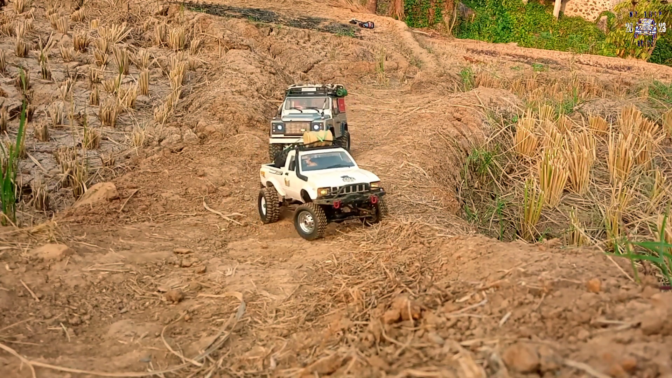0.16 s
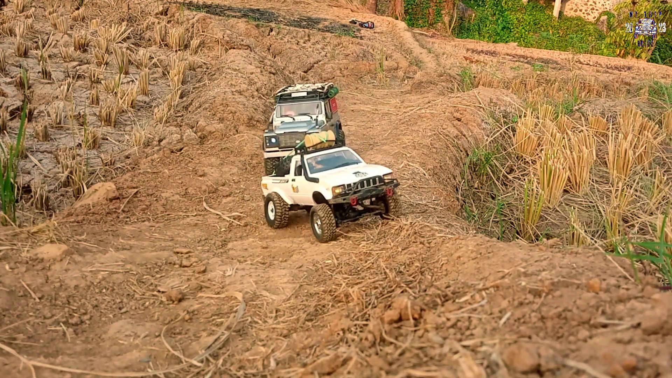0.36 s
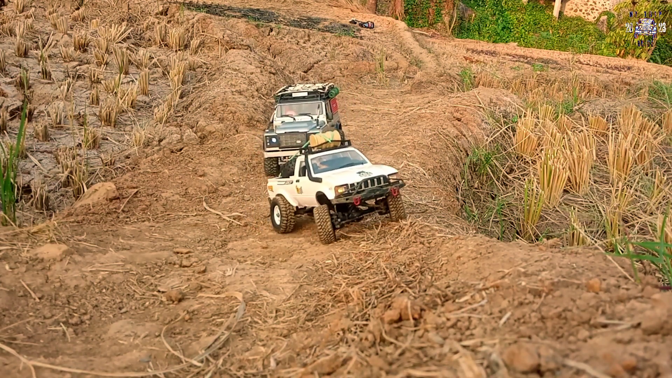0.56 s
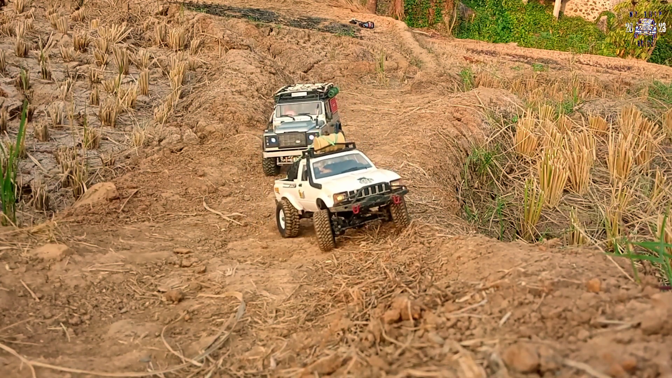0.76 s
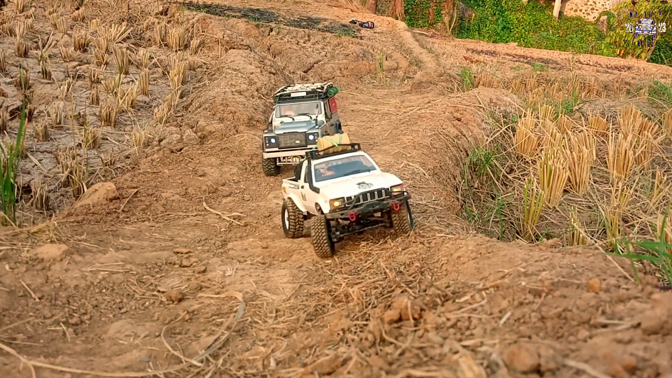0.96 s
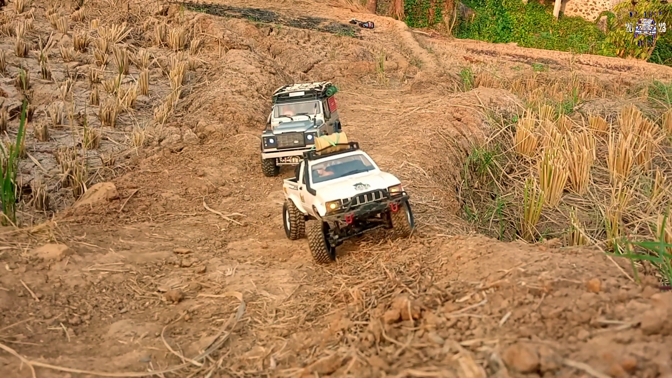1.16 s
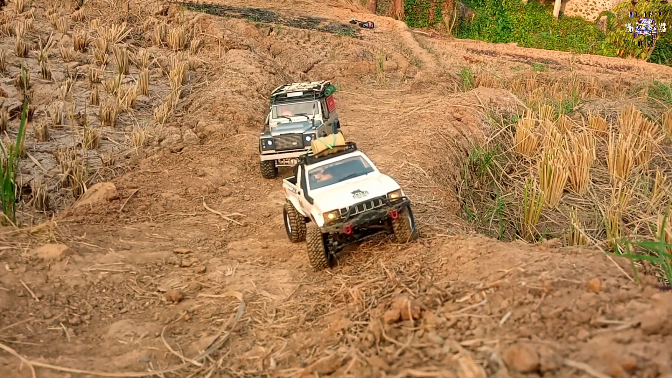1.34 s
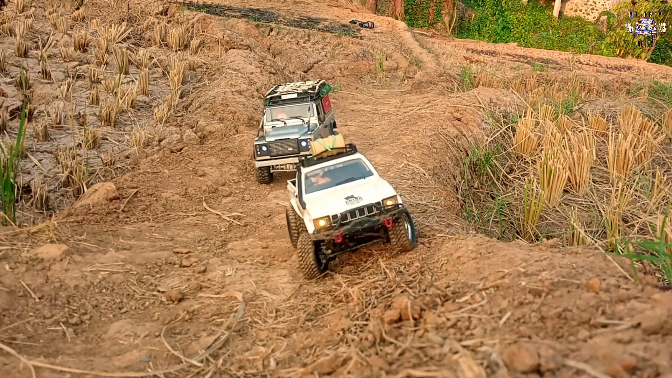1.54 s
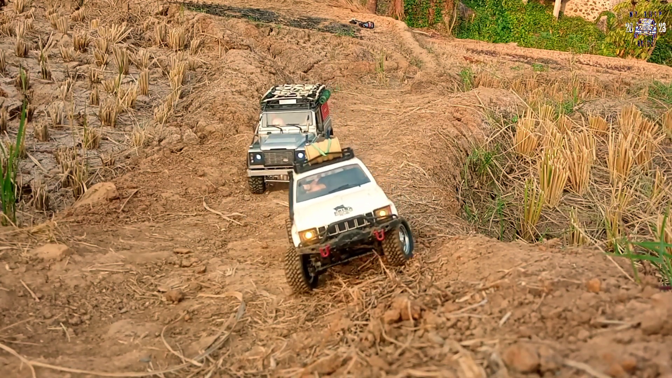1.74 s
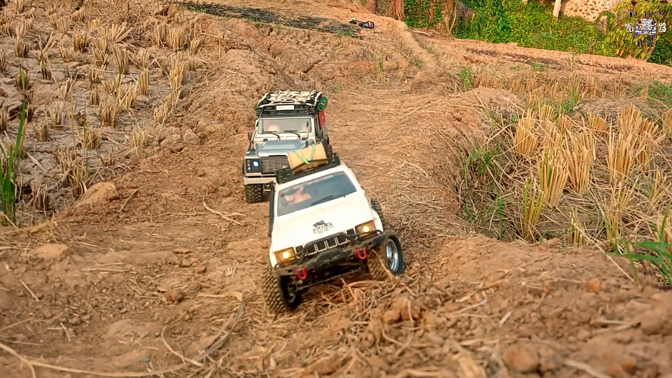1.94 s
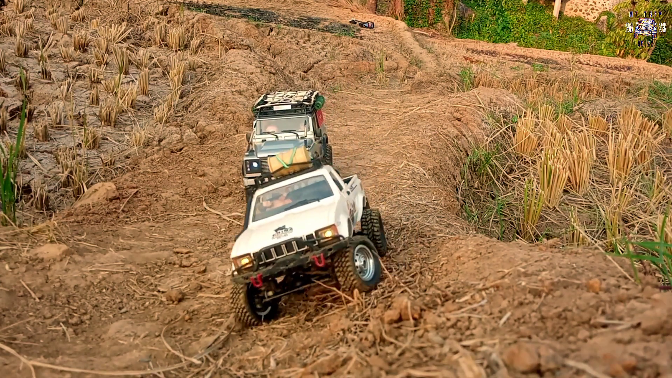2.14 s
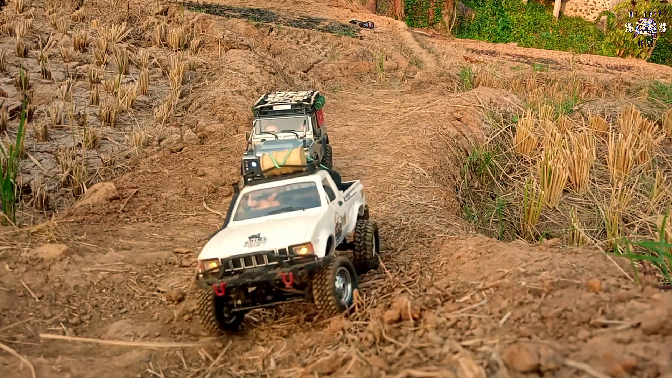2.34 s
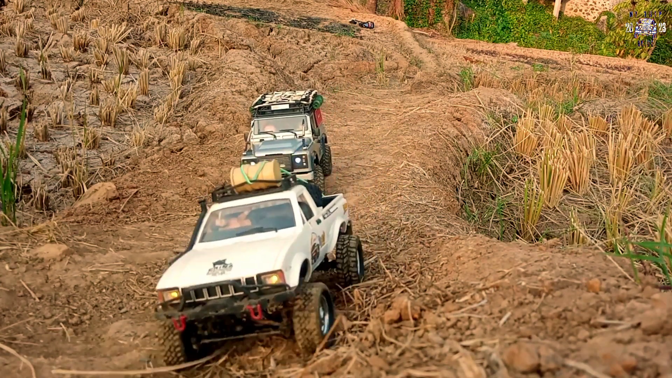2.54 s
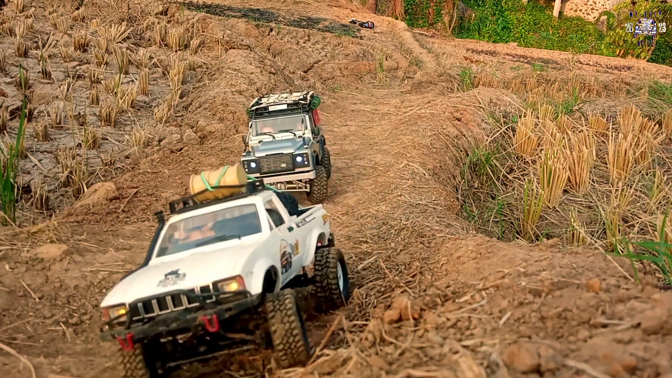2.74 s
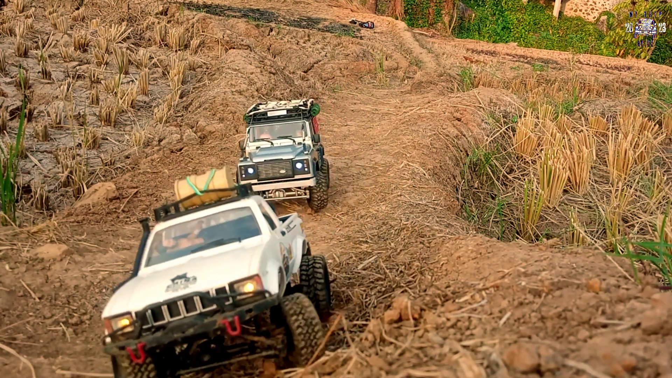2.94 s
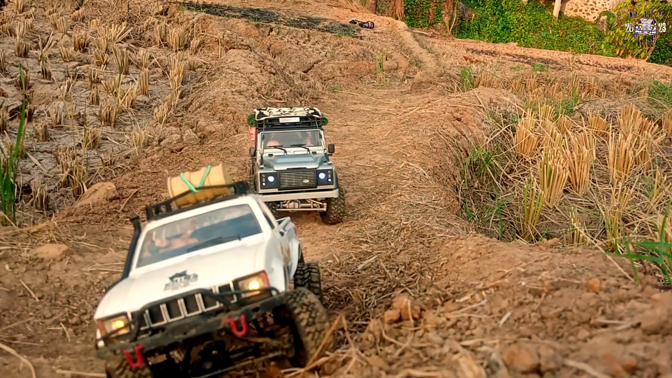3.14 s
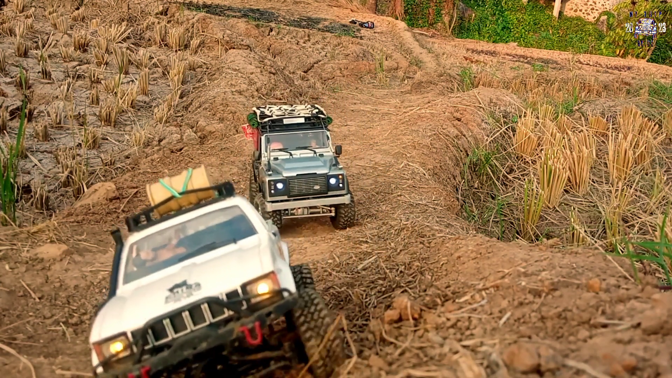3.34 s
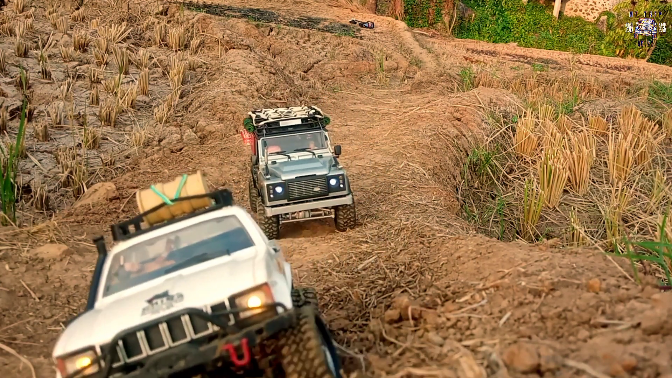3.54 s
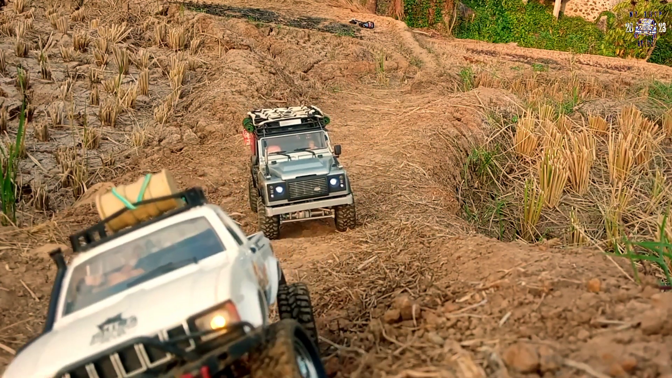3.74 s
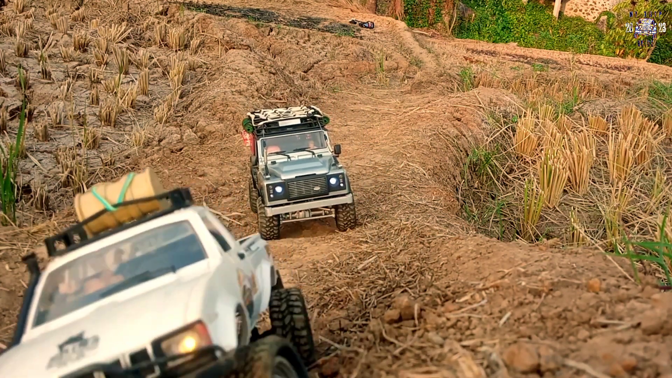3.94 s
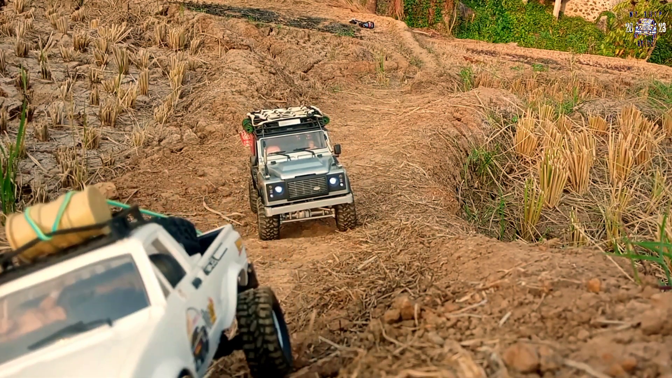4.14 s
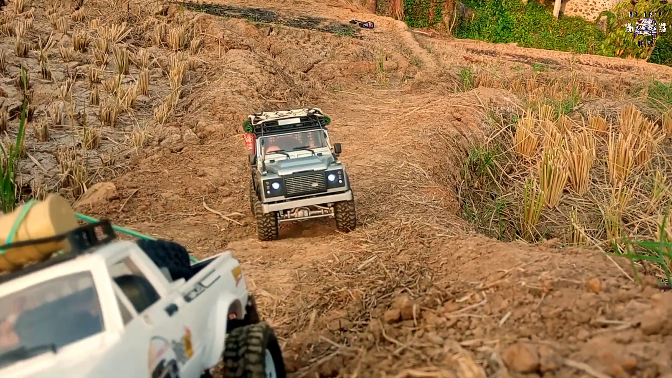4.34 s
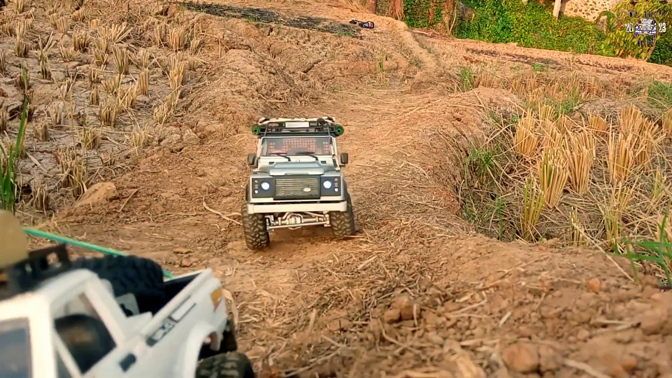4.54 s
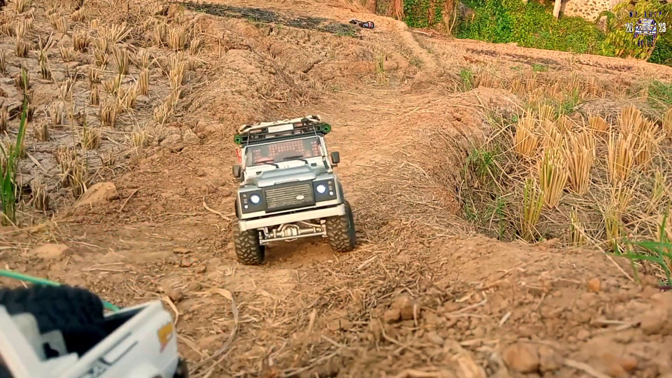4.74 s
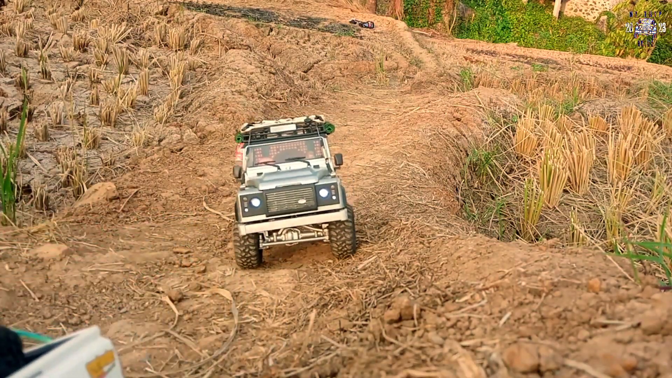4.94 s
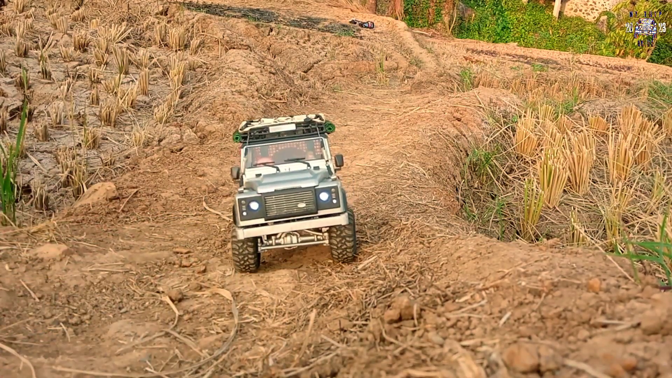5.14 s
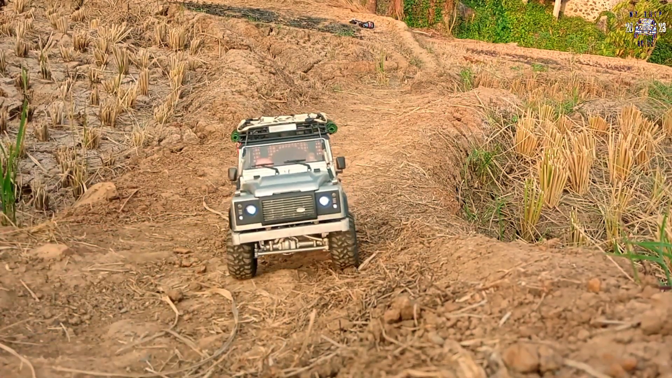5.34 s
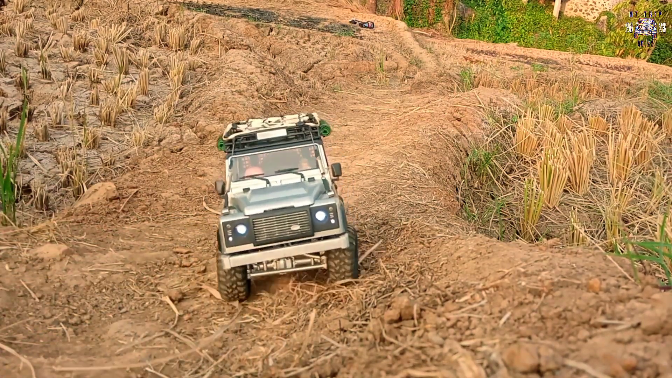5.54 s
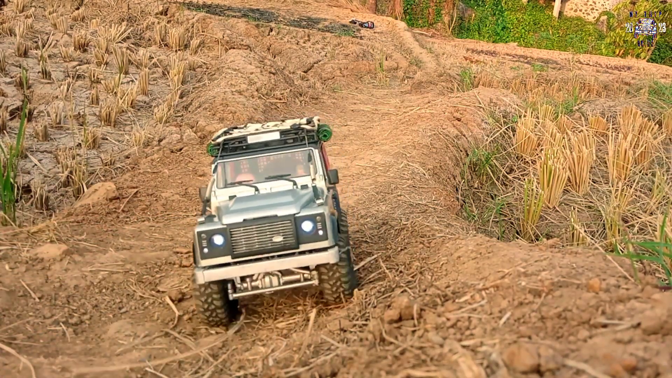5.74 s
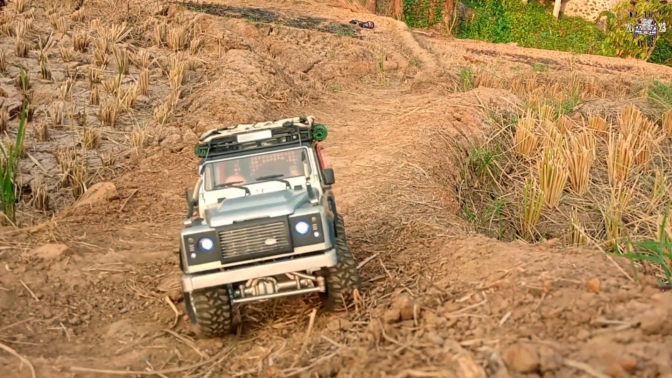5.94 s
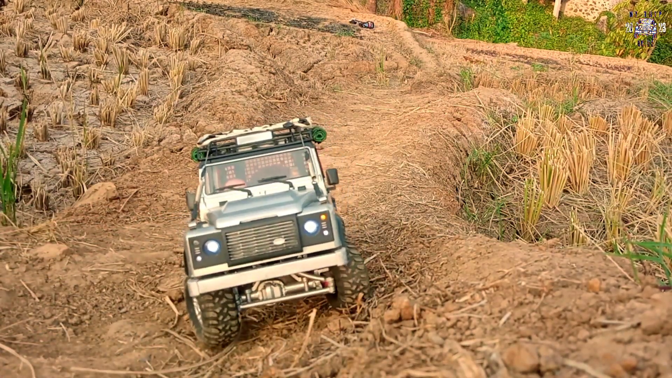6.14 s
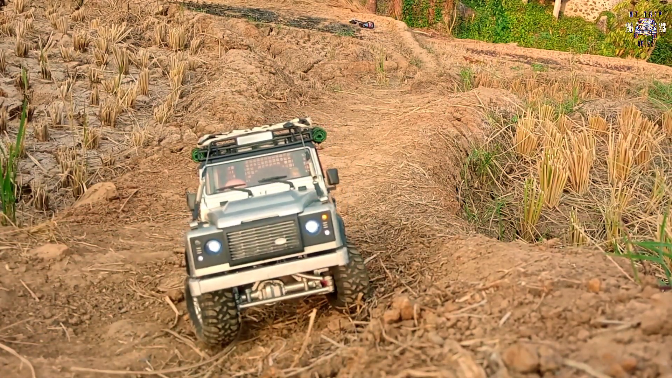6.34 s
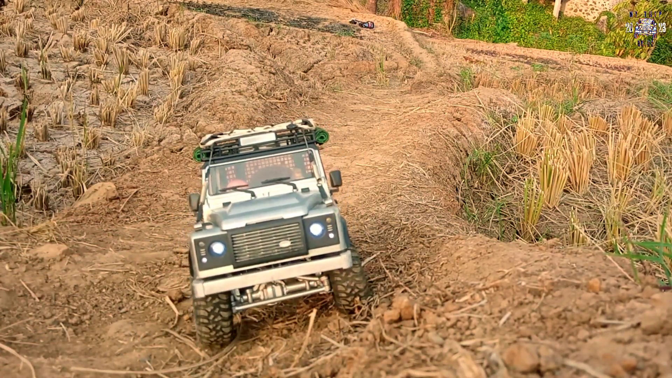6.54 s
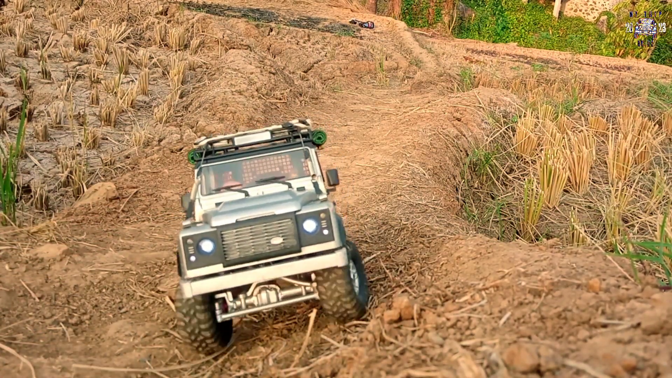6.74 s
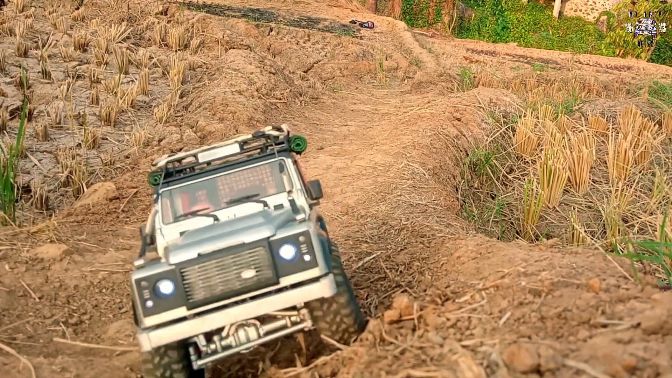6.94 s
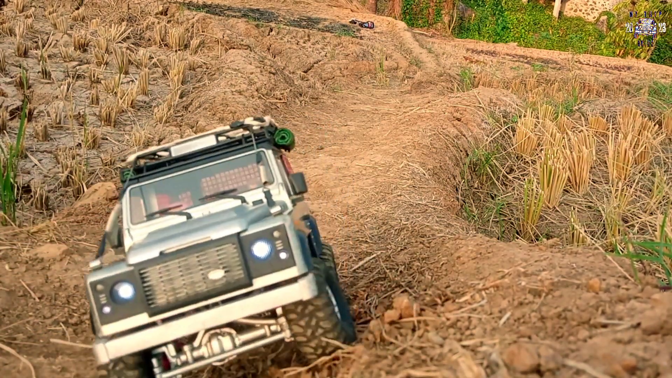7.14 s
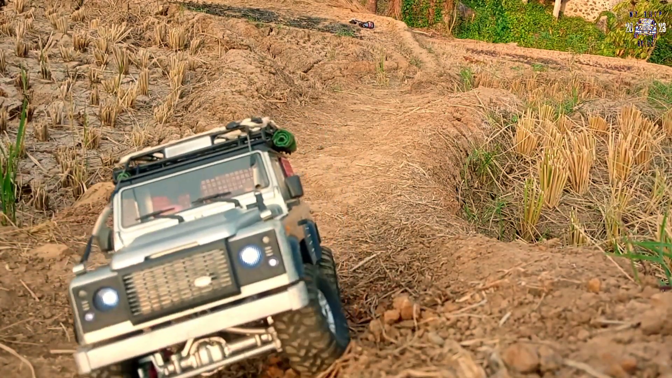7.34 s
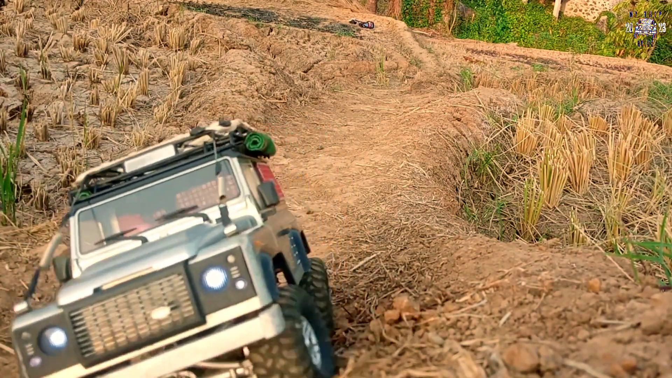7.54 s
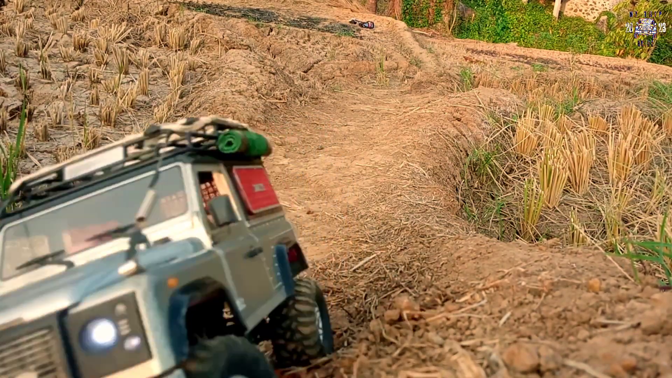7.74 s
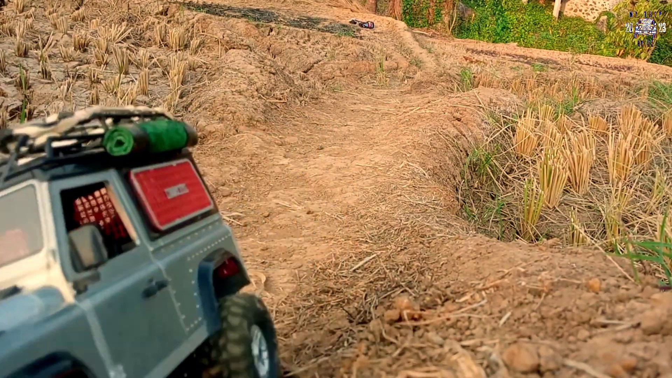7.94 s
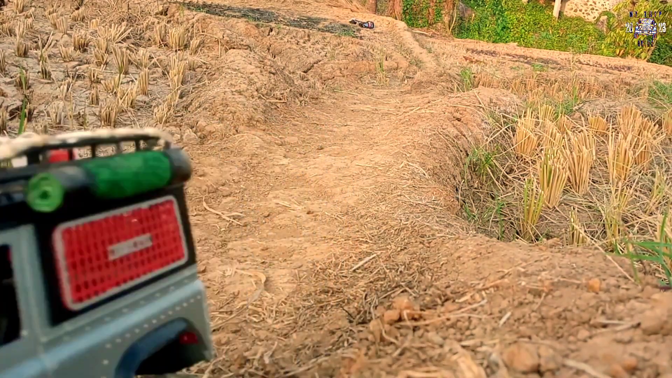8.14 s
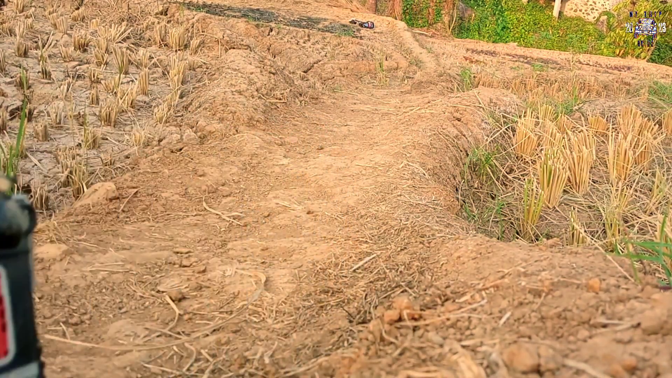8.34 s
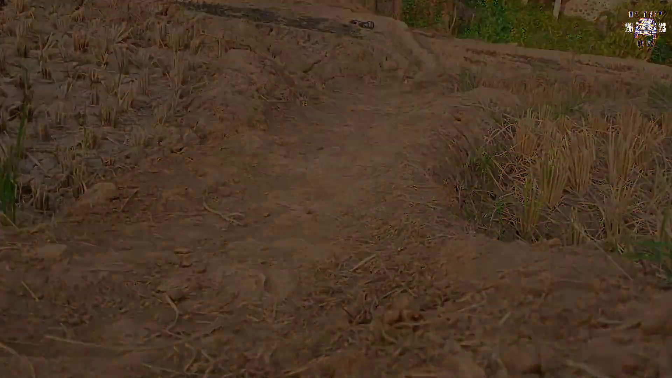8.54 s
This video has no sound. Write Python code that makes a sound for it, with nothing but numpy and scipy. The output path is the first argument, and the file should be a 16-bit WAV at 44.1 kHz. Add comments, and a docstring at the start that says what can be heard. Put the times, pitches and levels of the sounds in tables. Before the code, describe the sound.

Open, dry outdoor air with a distant one-cylinder diesel thudding softly about 17 to 20 times a second throughout; a faint far engine hum surfaces around 0.5-1.9 s. Close to a low microphone, a small electric truck creeps over soil, its gears whining in short uneven pulses near 2-3 kHz with a dry treble rasp, briefly easing around 1.2 s. Tyres grind crumbly dirt, with light straw ticks and small knocks at 3-4.6 s. From 4.4 s the whine strengthens; another distant engine rises in pitch until about 6.3 s. Around 5.3 s a second truck takes over, louder and shriller at 3-3.8 kHz, with a droning shell, strong crunching and snaps near 6 s. The whine weakens after 7.6 s. Around 8 s thin high squeals sound, sharp cracks hit at 8.1 and 8.4 s, a wheel drops with a low thump at 8.3 s, then gears and tyres subside.

```python
"""Far away a slow one-cylinder diesel thuds, made of noise puffs, and an engine hums briefly as harmonics.
Nearby a small electric truck creeps over dry soil: each touch of the throttle makes its gear tones whine and rasp.
Its tyres grind dirt (clumped noise) and snap straw (short noise bursts). Then a far engine hums with rising pitch
while a second truck takes over, close and louder, with a droning shell. Near the end thin squeals (narrow noise)
sound and a wheel drops off a lump (a short low tone)."""
import sys
import numpy as np
from scipy import signal
from scipy.fft import rfft, irfft, next_fast_len
from scipy.io import wavfile
from scipy.ndimage import uniform_filter1d, map_coordinates

SR = 44100
rng = np.random.default_rng(int(sys.argv[2]) if len(sys.argv) > 2 else 0)


def inscribe(sig):
    """Save sig as 16-bit PCM at rate SR to the path in sys.argv[1].

    A 1-D sig is mono; a 2-D sig holds one channel per row.
    Samples are clipped to [-1, 1] before scaling.
    """
    pcm = np.round(np.clip(np.atleast_2d(sig).T, -1, 1) * 32767)
    wavfile.write(sys.argv[1], SR, pcm.astype(np.int16))


N = 383219
T = np.arange(N) / SR  # time of each sample, s

# Touches of the throttle: middle t/s, highest gear-mesh f/Hz, time within SAG_HZ of it/s, whine level/dB
THROTTLE_TOUCHES = [(.122, 2600, .055, -33), (.188, 2000, .06, -39), (.262, 1870, .09, -39),
                    (.41, 1800, .1, -42), (.507, 2270, .035, -38), (.8, 2020, .12, -44),
                    (1.692, 2480, .05, -33), (1.73, 2350, .08, -36), (1.82, 2480, .11, -35),
                    (1.903, 2520, .055, -35), (1.96, 2180, .08, -38), (2.083, 2220, .07, -41),
                    (2.18, 2470, .052, -37), (2.385, 2190, .1, -38), (2.49, 2460, .2, -39),
                    (2.6, 2750, .15, -41), (2.695, 3260, .11, -37), (2.8, 2520, .13, -36),
                    (2.88, 2300, .08, -41), (2.92, 3050, .035, -36), (3.23, 2180, .04, -38),
                    (3.285, 2150, .035, -40), (3.43, 2180, .08, -40), (3.515, 2720, .064, -30.5),
                    (3.65, 2180, .09, -45), (4.224, 2470, .054, -32), (4.366, 2640, .075, -31),
                    (4.44, 2550, .12, -35), (4.497, 2950, .04, -32), (4.612, 2610, .075, -32),
                    (4.69, 2320, .14, -33), (4.77, 2650, .08, -31), (4.817, 3130, .042, -23),
                    (4.897, 2660, .07, -27), (4.963, 2700, .04, -26), (5.052, 2340, .052, -29),
                    (5.12, 2460, .14, -28), (5.225, 2270, .06, -29), (5.344, 2040, .13, -31),
                    (5.465, 2600, .045, -28), (5.53, 2180, .03, -27), (5.628, 3180, .095, -22),
                    (5.75, 3000, .16, -28.5), (5.92, 3580, .095, -20), (6, 3520, .085, -20),
                    (6.08, 2830, .08, -30), (6.175, 3250, .075, -24), (6.24, 3600, .06, -21),
                    (6.41, 3240, .09, -23), (6.515, 3290, .14, -23), (6.585, 3540, .06, -27),
                    (6.648, 3800, .06, -26), (6.768, 3320, .12, -28), (6.822, 3800, .048, -24),
                    (6.925, 3620, .08, -27), (6.98, 3800, .062, -29), (7.13, 3330, .19, -30),
                    (7.262, 3490, .11, -27), (7.357, 3700, .065, -26), (7.448, 2700, .1, -29),
                    (7.528, 3500, .07, -28), (7.628, 3410, .08, -30.5), (7.745, 3400, .09, -35),
                    (7.81, 3060, .08, -36), (8.06, 2750, .08, -33), (8.235, 2750, .06, -39)]
# The housing favours some pitches of the whine: f/Hz, level/dB
WHINE_BOOSTS = [(1600, -4), (2300, 2), (2800, -3), (3300, 2.5), (3800, -3)]
# Rough upper gear tones of each truck: multiple of the mesh frequency, level/dB
FIRST_GEAR_TONES = [(1.33, -7), (1.41, -5), (1.5, 1), (2, -6), (2.44, -8), (3, -6), (3.6, -6)]
SECOND_GEAR_TONES = [(1.5, -3), (1.72, -3), (2, -2), (2.42, 0), (2.5, 0), (2.8, -3), (3, 2), (3.25, -3)]
# Gearbox noise at cruising speed: t/s, rattle level/dB, tooth rasp level/dB
GEARBOX_LEVELS = [(0, -43, -45), (.25, -37, -41), (.9, -39, -42.5), (1.18, -57, -51), (1.4, -39.5, -45),
                  (2.25, -44.5, -42.5), (2.8, -39, -36.5), (3.85, -45.5, -37), (4.65, -30, -35.5),
                  (5.25, -30, -36.5), (5.95, -35, -27.5), (6.3, -39, -34.5), (6.7, -38.5, -32.8),
                  (7.5, -39, -35), (8.38, -35, -36), (8.43, -54, -53)]
# Tone colour of the rattling housing and of each truck's rasp: f/Hz, relative level/dB
HOUSING_COLOUR = [(1800, -33), (2350, 2), (2850, -20), (3100, 3.5), (3450, 7), (3800, -1), (4200, -13),
                  (5200, -30)]
FIRST_RASP_COLOUR = [(3900, -13), (4200, -16.5), (4900, -11), (5700, -4), (6800, -6.5), (8500, 5),
                     (9000, 0.5), (9600, 3), (10500, -5.5), (11450, -2), (12100, -15.5), (13000, -6.5),
                     (14300, -21), (15700, -15)]
SECOND_RASP_COLOUR = [(3900, -17), (4450, -5), (5000, -15.5), (5550, -5), (7000, -8), (8000, -2.5),
                      (8700, 2), (9400, -2.5), (10000, -4), (11400, -9.5), (12600, -15.5), (14100, -21),
                      (15700, -23)]
# The second truck's droning body shell: t/s, level/dB; then its resonance: f/Hz, relative level/dB
DRONE_LEVELS = [(5.4, -79), (5.7, -47), (6.4, -47), (6.6, -41.5), (7.36, -45.5), (8.1, -56), (8.5, -79.5)]
SHELL_COLOUR = [(1450, -12), (1700, 3), (1800, 9), (1920, 10), (2150, -15)]
# Thin squeals, probably from the steering servos: middle t/s, length/s, centre f/Hz, width/Hz, level/dB
SQUEAL_EVENTS = [(3.39, .1, 5950, 200, -44), (8.03, .22, 8650, 450, -33), (8.26, .2, 8650, 450, -34),
                 (7.95, .9, 13350, 700, -51)]
# Thin steady buzz, probably from the servos: t/s, base f/Hz, level/dB
BUZZ_TRACK = [(0, 252.5, -62), (1.8, 252.5, -56), (4.3, 252.5, -55), (5.6, 252.5, -49), (8.69, 252.5, -60)]
# Its harmonics: multiple of the base frequency, level/dB
BUZZ_HARMONICS = [(2, -9), (3, -7), (4, -3.5)]
# Tyres rolling on the ground: t/s, low grinding level/dB, crunch level/dB
TYRE_LEVELS = [(0, -44.5, -39.5), (1.3, -52, -42.5), (2.9, -47, -39.5), (4.3, -46, -36.8),
               (6.05, -43.5, -30.5), (6.6, -47.5, -36), (8.35, -43, -37), (8.46, -51.5, -45),
               (8.69, -51, -53)]
# A tyre slips and scrabbles: start t/s, length/s, grinding level/dB, crunch level/dB
TYRE_SLIPS = [(2.45, .25, -53, -40.5), (2.9, 0.042, -43, -33.5), (3.14, .1, -43.5, -42),
              (4.046, 0.019, -39, -39), (4.201, 0.021, -46, -37), (4.44, 0.082, -43, -35),
              (4.79, 0.041, -40, -31), (6.21, .02, -43, -33), (6.35, .03, -44, -34), (6.87, .1, -40, -40),
              (7.7, .07, -35, -35), (8.029, .11, -34, -39), (8.237, .05, -32.5, -36)]
# Tone colour of the grinding and of the crunch: f/Hz, relative level/dB
GRIND_COLOUR = [(150, -15), (300, -8), (440, -2), (560, -3.5), (700, 2), (920, -3), (1500, -26)]
CRUNCH_COLOUR = [(500, -49), (800, -6), (1020, 4), (1150, 1), (1280, 6), (1700, 2), (2400, 0.5),
                 (3500, -1.5), (5000, -14.5), (9000, -21), (15000, -39)]
# Straw and grit snapping under the tyres: t/s, level/dB
SNAP_EVENTS = [(.186, -33), (.268, -27), (.385, -34), (1.891, -28), (2.452, -27), (2.963, -27),
               (4.047, -30), (4.813, -18), (4.978, -19), (5.436, -22), (5.985, -16), (6.331, -24),
               (6.566, -17), (7.992, -24), (8.005, -23), (8.1085, -9.5), (8.3848, -9.5), (8.598, -35)]
# What a snap rings with: f/Hz, relative level/dB
SNAP_SPECTRUM = [(400, -20), (1300, -19), (1950, -2), (2900, 1.5), (3400, -2.5), (4200, -5.5), (5400, -22),
                 (7700, -9.5), (10500, -23), (15000, -32)]
# Wheels knocking on clods and pebbles and dropping onto soil: t/s, level/dB, f/Hz, time to fall 60 dB/s
BUMP_EVENTS = [(3.155, -29, 470, 0.055), (3.792, -23, 2750, .022), (3.989, -26, 2700, .02),
               (4.058, -26, 1200, .04), (4.56, -24, 756, 0.046), (5.986, -17, 1150, .025),
               (6.087, -17, 1210, 0.038), (6.955, -24, 688, .06), (8.272, -25, 660, .12),
               (8.34, -13, 99, 0.1)]
# Distant diesel: t/s, firings per second/Hz, thud level/dB, muffler ring level/dB
DIESEL_TRACK = [(0, 20, -38.5, -55), (1.8, 17.9, -37.5, -49), (3.8, 17.45, -37, -43),
                (5, 17.8, -36.5, -46.5), (6, 16.95, -37, -63), (8.3, 18.5, -34, -45.5),
                (8.69, 17.2, -47.5, -73)]
# Tone colour of its exhaust and of its muffler: f/Hz, relative level/dB
EXHAUST_COLOUR = [(30, -40), (50, -16), (70, -9.5), (100, -3.5), (135, -3.5), (163, 3), (185, -4),
                  (215, -4), (260, -11.5), (450, -16.5), (600, -19)]
MUFFLER_COLOUR = [(240, -22), (290, -10), (307, 6), (324, -8), (380, -25)]
# The early distant engine, then the later one with rising pitch: t/s, firing f/Hz, level/dB
HUM_TRACK = [(0, 60.7, -65), (.5, 60.95, -56), (1.25, 60.85, -52), (1.9, 61.44, -71)]
REVVING_TRACK = [(3.8, 33.95, -80), (4.4, 36, -47.5), (5, 39, -48.5), (5.5, 42.66, -44), (5.9, 46.2, -51),
                 (6.4, 47.36, -78)]
# Their harmonics: multiple of the firing frequency, level/dB
HUM_HARMONICS = [(5, -4), (6, 0), (7, -5), (8, 4.5), (9, -5)]
REVVING_HARMONICS = [(4, -2), (5, 1), (6, -0.86)]
# Tone colour of the open-air background: f/Hz, relative level/dB
OUTDOOR_COLOUR = [(20, -45), (60, -13), (200, -3), (400, -12.5), (2700, -12.5), (5200, -38), (7500, -12),
                  (15000, -46)]

CRAWL_HZ, CRUISE_HZ = 1748, 2500  # gear mesh between touches, and the reference speed
SAG_HZ, PINION_TEETH = 300, 8
WHINE_LOSS_DB_PER_HZ = .012  # the whine weakens below the speed that a touch reaches
HANDOVER_S, HANDOVER_LENGTH_S = 5.25, 0.36  # the second truck takes over from the first
SCRABBLE_ATTACK_S, SCRABBLE_RELEASE_S = 0.014, 0.042
TOP_HZ = 15600  # upper band limit


def throttle():
    """Each touch spins the motor up in an arc and lets it coast back to a crawl; gives mesh Hz and whine dB."""
    mesh_hz = np.full(N, float(CRAWL_HZ))
    whine_db = np.full(N, -np.inf)
    for s, top_hz, length, db in THROTTLE_TOUCHES:
        near = slice(max(0, round((s - .5) * SR)), round((s + .5) * SR))
        t = T[near] - s
        lag_hz = SAG_HZ * (2 * t / length) ** 2
        mesh_hz[near] = np.maximum(mesh_hz[near], top_hz - lag_hz)
        whine_db[near] = np.maximum(whine_db[near], db - WHINE_LOSS_DB_PER_HZ * lag_hz)
    boost_hz, boost_db = np.transpose(WHINE_BOOSTS)
    return mesh_hz, whine_db + np.interp(mesh_hz, boost_hz, boost_db)


def mesh(mesh_hz):
    """Phase of the meshing teeth, swaying a little, and speed in octaves above cruising."""
    angle = 2 * np.pi * np.cumsum(mesh_hz) / SR + 0.61 * wobble(70)
    return angle, np.log2(mesh_hz / CRUISE_HZ)


def whine(angle, db, flutter_db, rough):
    """The main gear tone; backlash shakes its phase and strength, and body resonances colour it as it glides."""
    load = amp(flutter_db * wobble(130)) * (1 + 0.27 * wobble(700))
    runout = 1 + .3 * wobble(60) * np.sin(angle / PINION_TEETH)  # once per turn of the pinion
    shaken = angle + rough * wobble(420)
    tone = np.sin(shaken) + amp(-25) * np.sin(2 * shaken)
    tone = ripple(load * runout * tone, depth_db=1.3, spacing_hz=110)
    return amp(db) * unit(tone)


def gearbox(angle, speed, rattle_db_per_octave=7, rasp_db_per_octave=8):
    """The teeth rattle the housing and rasp in the treble, louder with speed; one truck fades into the other."""
    rattle_db, rasp_db = curves(GEARBOX_LEVELS)
    second = np.clip((T - HANDOVER_S) / HANDOVER_LENGTH_S, 0, 1)
    first_teeth = teeth(angle, FIRST_GEAR_TONES, rough=.4, worn=1.3, clatter=1.6)
    first_teeth = ripple(first_teeth, depth_db=1.9, spacing_hz=90)
    second_teeth = teeth(angle, SECOND_GEAR_TONES, rough=.42, worn=1.3, clatter=1.5)
    second_teeth = ripple(second_teeth, depth_db=1.9, spacing_hz=90)

    def blend(first_colour, second_colour):
        """Crossfade the trucks at even power."""
        first_part = np.sqrt(1 - second) * colour(first_teeth, first_colour)
        return first_part + np.sqrt(second) * colour(second_teeth, second_colour)

    rattle = amp(rattle_db + rattle_db_per_octave * speed) * blend(HOUSING_COLOUR, HOUSING_COLOUR)
    rasp = mottled(blend(FIRST_RASP_COLOUR, SECOND_RASP_COLOUR))
    rasp = amp(rasp_db + rasp_db_per_octave * speed) * rasp
    return (rattle + rasp) * amp(1.6 * wobble(190))


def teeth(angle, tones, rough, worn, clatter):
    """Gear tones, more blurred the higher they lie, with the ladder of worn teeth and random clatter."""
    shaken = angle + rough * wobble(380)
    lines = sum(amp(db + 2.5 * wobble(40)) * np.sin(k * shaken) for k, db in tones)
    return unit(lines) + worn * worn_teeth(shaken) + clatter * grains(1800, 3.5, .5)


def worn_teeth(angle, order=88):
    """Tooth errors repeat with every turn of the pinion: a ladder of overtones that shifts with the load."""
    place = angle / (2 * np.pi * PINION_TEETH) * order % order

    def turn():
        """One random tooth pattern, read round and round."""
        return map_coordinates(rng.standard_normal(order), [place], mode="grid-wrap")

    return unit(turn() * wobble(25) + turn() * wobble(25))


def mottled(x, depth_db=1.8):
    """Bands of the rasp flare and fade independently."""
    bands = signal.stft(x, nperseg=512)[2]
    # smooth random levels over frequency, then over time
    field = uniform_filter1d(rng.standard_normal(bands.shape), 7, 0)
    field = uniform_filter1d(field, 7, 1)
    return signal.istft(bands * amp(depth_db * unit(field)), nperseg=512)[1][:N]


def drone(angle):
    """A slower gear stage sings out whenever it meets the resonance of the shell."""
    tone = amp(3 * wobble(110)) * np.sin(angle / 2 + .8 * wobble(260))
    return amp(curves(DRONE_LEVELS)[0]) * colour(tone, SHELL_COLOUR)


def squeals():
    """Narrow bands of friction noise that swell and fade."""
    out = np.zeros(N)
    for s, length, centre_hz, width, db in SQUEAL_EVENTS:
        band = unit(filtered(noise(), lambda hz: 1 / (1 + (2 * (hz - centre_hz) / width) ** 2)))
        swell = np.sqrt(np.clip(1 - (2 * (T - s) / length) ** 2, 0, 1))
        out += amp(db) * band * swell
    return out


def tyres():
    """Tread blocks grind the soil and crush crumbs of it in clumps, harder whenever a tyre slips."""
    grinding, crunching = amp(curves(TYRE_LEVELS))
    for s, length, grind_db, crunch_db in TYRE_SLIPS:
        rise = (T - s) / SCRABBLE_ATTACK_S
        fall = (s + length - T) / SCRABBLE_RELEASE_S
        slip = np.exp(np.minimum(0, np.minimum(rise, fall)))
        grinding = np.hypot(grinding, amp(grind_db) * slip)
        crunching = np.hypot(crunching, amp(crunch_db) * slip)
    grind = grinding * amp(1.1 * wobble(45)) * colour(grains(300, 5.6, .5), GRIND_COLOUR)
    crunch = crunching * amp(1.7 * wobble(45)) * colour(grains(600, 4.5, 0.33), CRUNCH_COLOUR)
    return ripple(grind + crunch, depth_db=1.5, spacing_hz=55)


def snaps(t60=0.031, attack_s=.0003):
    """Each break sets off a dense, quickly damped clatter of plastic and dry stalk."""
    envelope = np.zeros(N)
    t = np.arange(SR // 5) / SR
    for s, db in SNAP_EVENTS:
        add(envelope, s, amp(db - 60 * t / t60) * (1 - np.exp(-t / attack_s)))
    return envelope * colour(noise(), SNAP_SPECTRUM)


def bumps():
    """Wheels knock briefly against hard clods, or bounce once with a low thud."""
    out = np.zeros(N)
    t = np.arange(SR // 4) / SR
    for s, db, hz, t60 in BUMP_EVENTS:
        envelope = amp(db - 60 * t / t60) * (1 - np.exp(-t / .001))
        add(out, s, -envelope * np.sin(2 * np.pi * hz * t))
    return out


def diesel(puff_s=0.021, between=1.0, steady=.5):
    """Each firing is a thud, partly alike from cycle to cycle and partly turbulent, smeared by distance."""
    rate, thud_db, ring_db = curves(DIESEL_TRACK)
    cycle = np.cumsum(rate * (1 + .004 * wobble(5))) / SR % 1
    age = cycle / rate  # seconds since the last firing
    pipe_ring = noise()[(age * SR).astype(int)]  # the same noise after every firing
    puff = np.exp(-age / puff_s)
    thuds = colour((puff + between) * (steady * pipe_ring + noise()), EXHAUST_COLOUR)
    muffler = colour(puff * (2 * pipe_ring + noise()), MUFFLER_COLOUR)
    return amp(thud_db) * thuds + amp(ring_db) * muffler


def hum(track, lines):
    """A few harmonics of a gliding base pitch, wavering in strength and phase."""
    hz, db = curves(track)
    angle = 2 * np.pi * np.cumsum(hz) / SR
    tones = sum(amp(level + 1.3 * wobble(5)) * np.sin(k * angle + .3 * wobble(9)) for k, level in lines)
    return np.sqrt(2) * amp(db) * tones


def outdoors():
    """Steady noise shaped like open air."""
    return amp(-49.5) * colour(noise(), OUTDOOR_COLOUR)


def amp(db):
    """Decibels to gain."""
    return 10 ** (np.asarray(db) / 20)


def unit(x):
    """Scale to rms 1."""
    return x / np.sqrt(np.mean(x ** 2) + 1e-20)


def curves(rows):
    """One value per sample for each column after the time."""
    s, *cols = np.transpose(rows)
    return [np.interp(T, s, c) for c in cols]


def wobble(rate):
    """A smooth random curve of rms 1 with rate knots a second."""
    knots = rng.standard_normal(int(N * rate / SR) + 4)
    return unit(map_coordinates(knots, [T * rate]))


def noise():
    """White noise."""
    return rng.standard_normal(N)


def grains(rate, spread_db, share):
    """Tiny impacts of very uneven size, rate a second, on a bed of noise; share is their part of the power."""
    struck = rng.random(N) < rate / SR
    hits = struck * rng.choice([-1, 1], N) * amp(spread_db * np.clip(noise(), -2, 2))
    return np.sqrt(share) * unit(hits) + np.sqrt(1 - share) * noise()


def filtered(x, response):
    """Filter x with a response that depends on frequency."""
    m = next_fast_len(N + 8192)  # spare room for the filter's tail
    return irfft(rfft(x, m) * response(np.fft.rfftfreq(m, 1 / SR)), m)[:N]


def colour(x, spectrum):
    """Shape x by a table of frequencies and levels, then scale to rms 1."""
    f, db = np.transpose(spectrum)

    def response(hz):
        """Join the points on a logarithmic pitch scale."""
        return amp(np.interp(np.log(hz + 1), np.log(f), db, left=-120, right=-120))

    return unit(filtered(x, response))


def ripple(x, depth_db, spacing_hz):
    """Many narrow resonances make the spectrum uneven."""
    knots = rng.standard_normal(int(SR / spacing_hz) + 4)
    return filtered(x, lambda hz: amp(depth_db * map_coordinates(knots, [hz / spacing_hz])))


def add(track, s, sound):
    """Mix a sound into the track at time s."""
    part = track[round(s * SR):][:len(sound)]
    part += sound[:len(part)]


def scene():
    """Both trucks over the open-air background."""
    mesh_hz, whine_db = throttle()
    angle, speed = mesh(mesh_hz)
    whines = whine(angle, whine_db, flutter_db=2.5, rough=.4)
    buzz = hum(BUZZ_TRACK, BUZZ_HARMONICS)
    trucks = whines + gearbox(angle, speed) + drone(angle) + squeals() + buzz
    ground = tyres() + snaps() + bumps()
    engines = diesel() + hum(HUM_TRACK, HUM_HARMONICS) + hum(REVVING_TRACK, REVVING_HARMONICS)
    return (trucks + ground + engines + outdoors())[None]


def record(dry, low_hz=50):
    """The microphone channel weakens the deepest bass and keeps nothing above its band limit."""

    def response(hz):
        """Second-order bass cut with a sharp upper limit."""
        s = 1j * hz / low_hz
        bass_cut = s * s / (s * s + np.sqrt(2) * s + 1)
        return bass_cut * (hz < TOP_HZ)

    return filtered(dry[0], response)[None]


dry = scene()
out = record(dry)
inscribe(out)
```